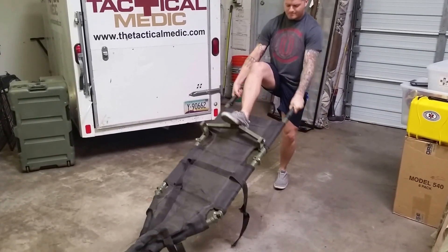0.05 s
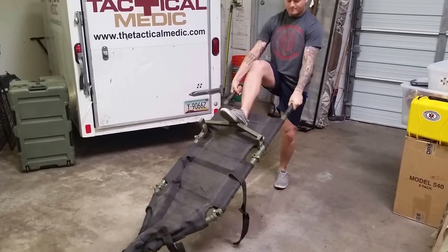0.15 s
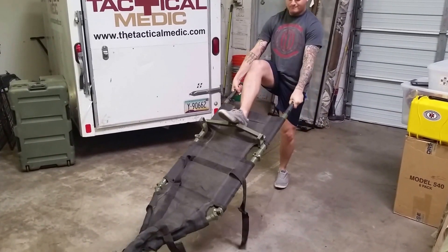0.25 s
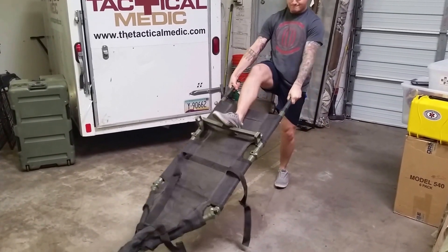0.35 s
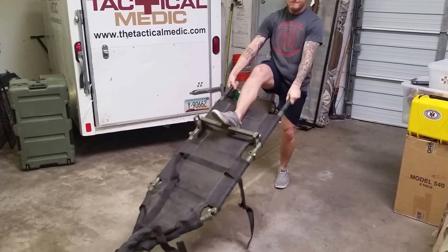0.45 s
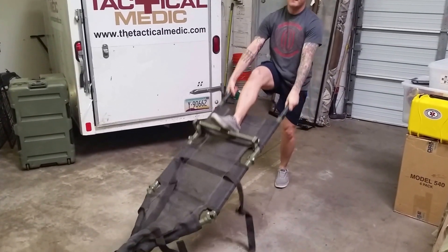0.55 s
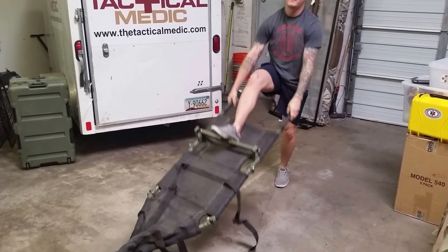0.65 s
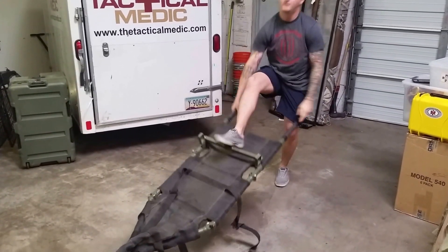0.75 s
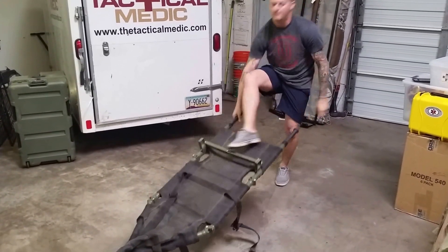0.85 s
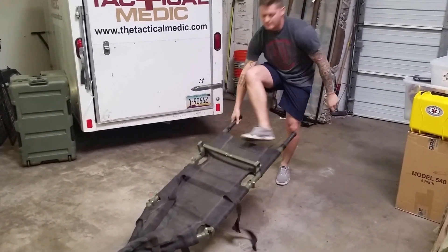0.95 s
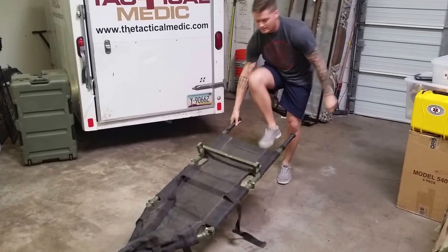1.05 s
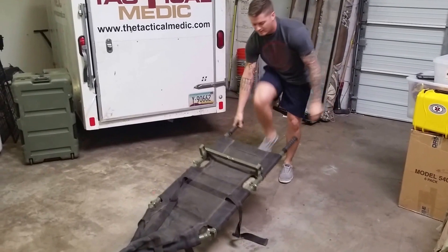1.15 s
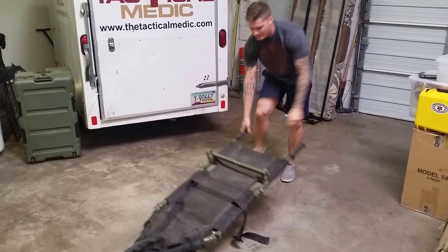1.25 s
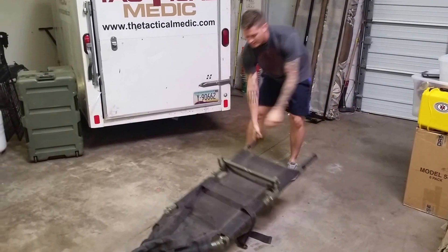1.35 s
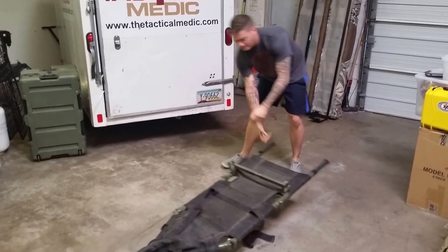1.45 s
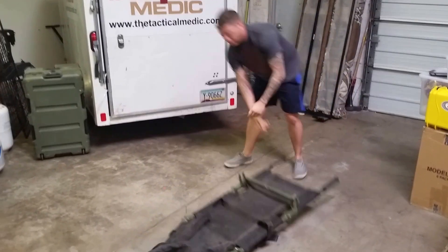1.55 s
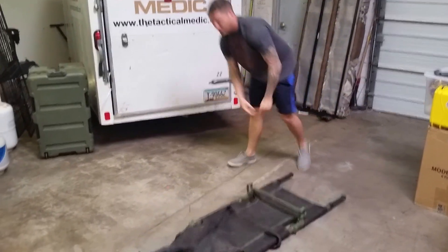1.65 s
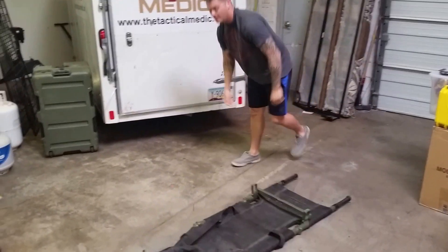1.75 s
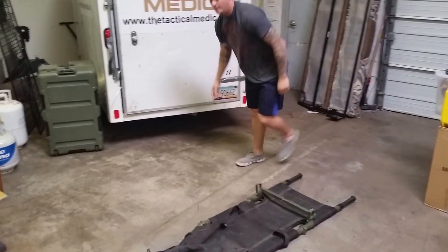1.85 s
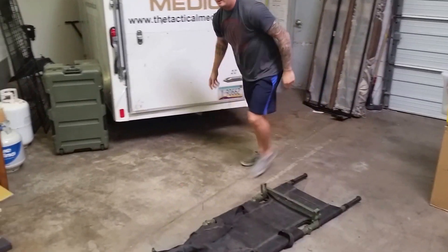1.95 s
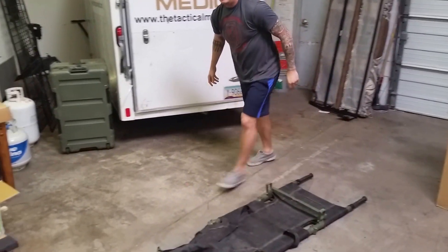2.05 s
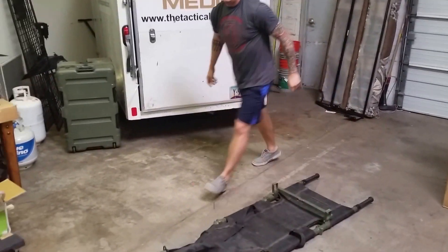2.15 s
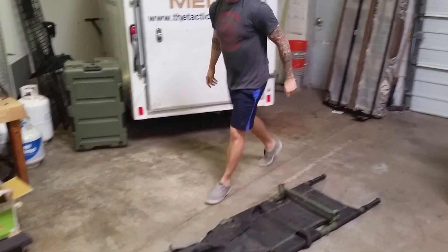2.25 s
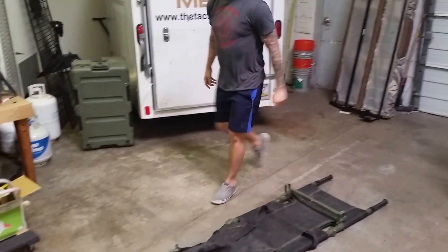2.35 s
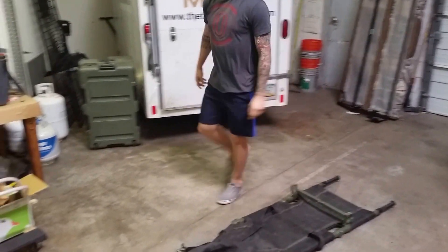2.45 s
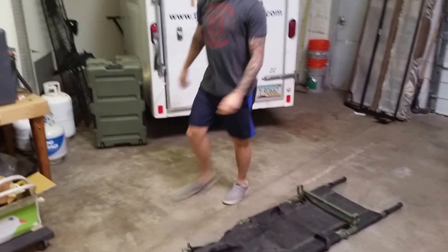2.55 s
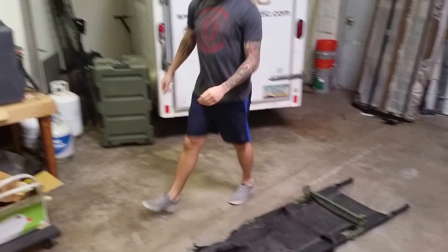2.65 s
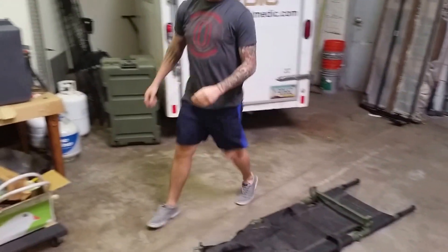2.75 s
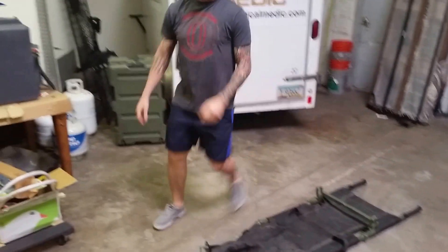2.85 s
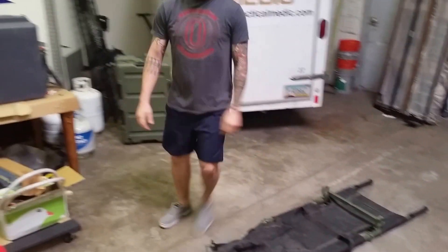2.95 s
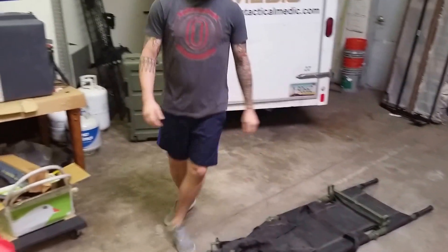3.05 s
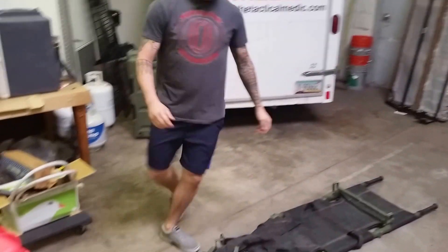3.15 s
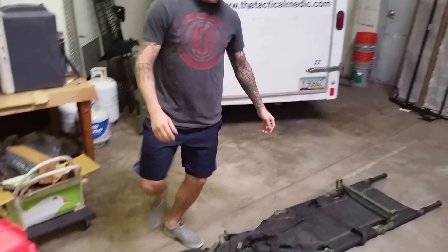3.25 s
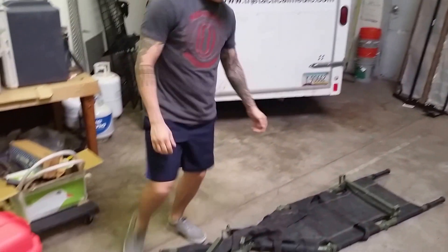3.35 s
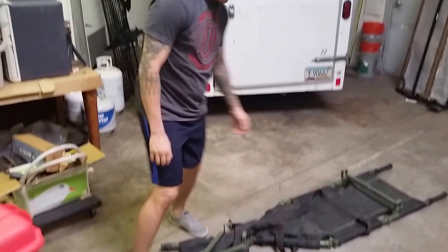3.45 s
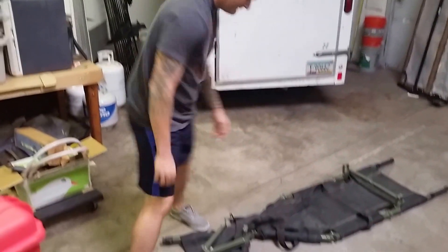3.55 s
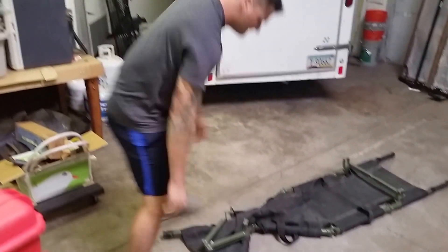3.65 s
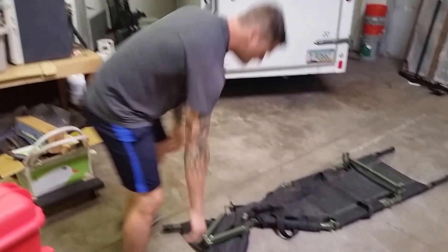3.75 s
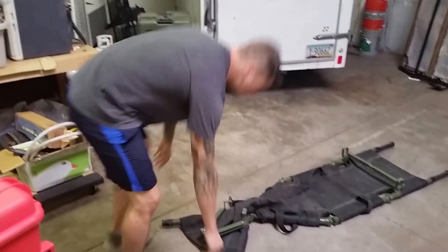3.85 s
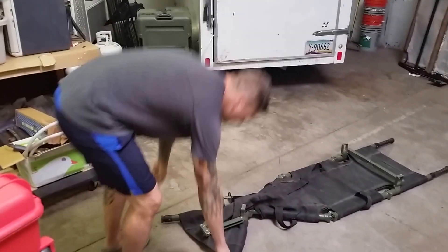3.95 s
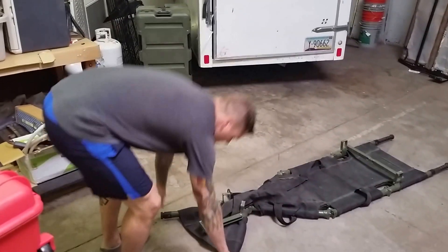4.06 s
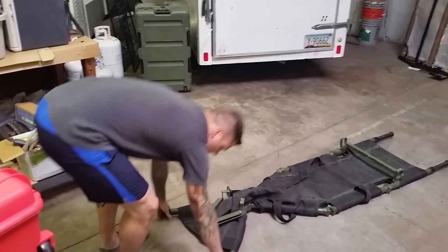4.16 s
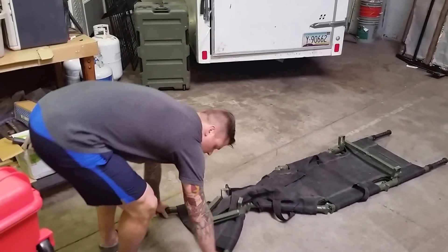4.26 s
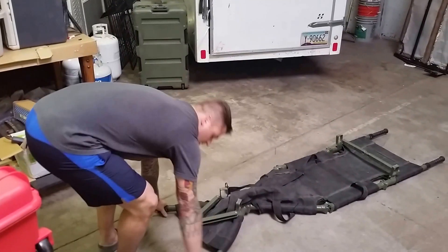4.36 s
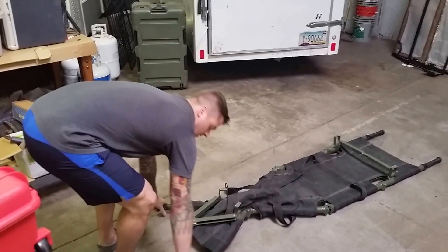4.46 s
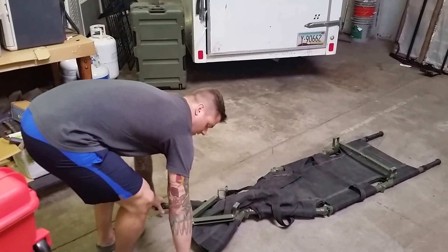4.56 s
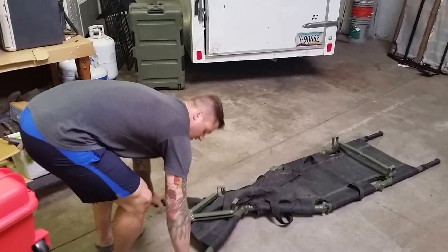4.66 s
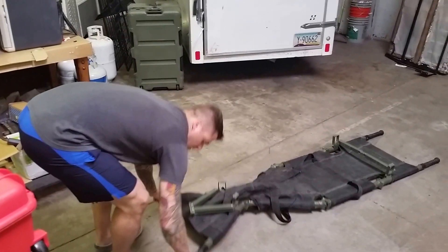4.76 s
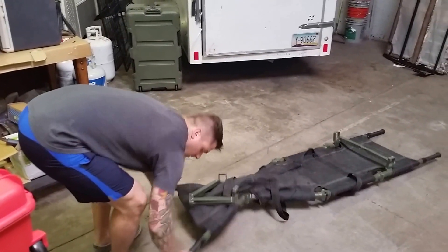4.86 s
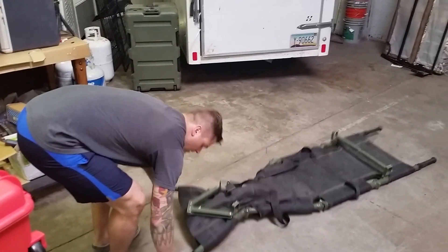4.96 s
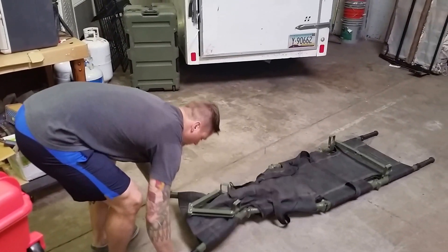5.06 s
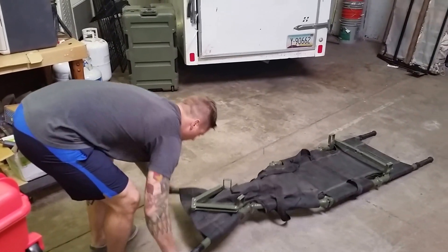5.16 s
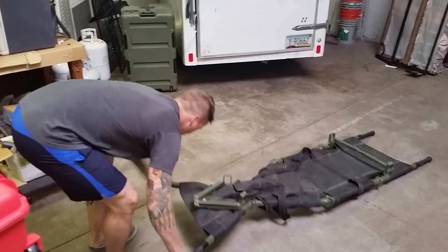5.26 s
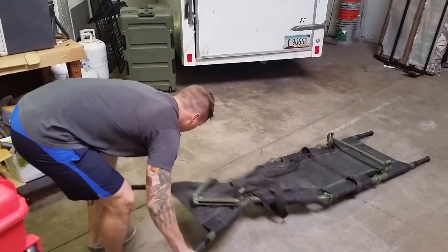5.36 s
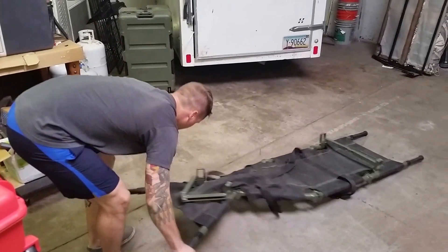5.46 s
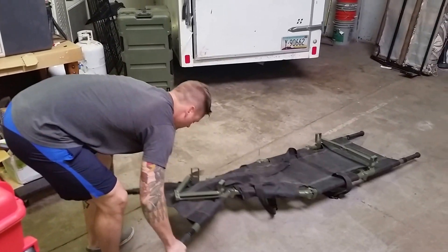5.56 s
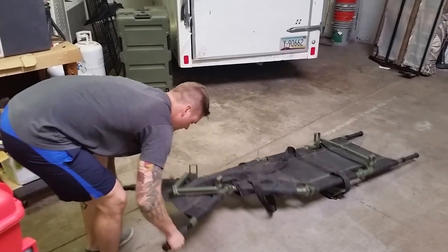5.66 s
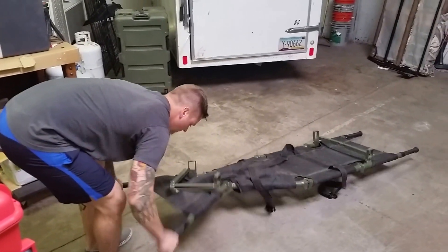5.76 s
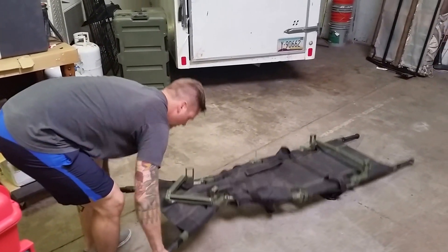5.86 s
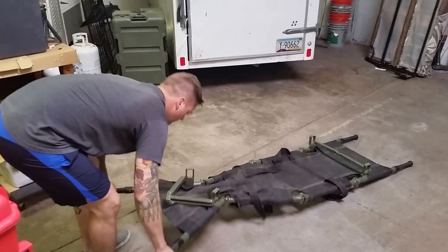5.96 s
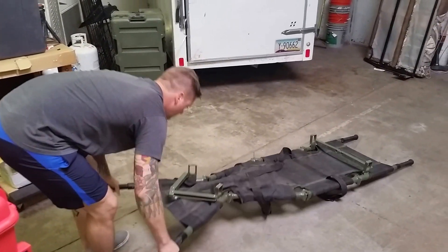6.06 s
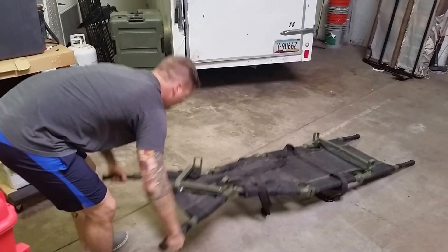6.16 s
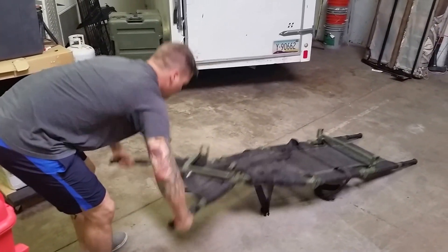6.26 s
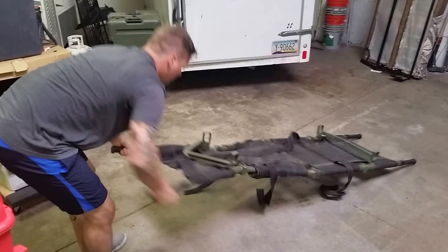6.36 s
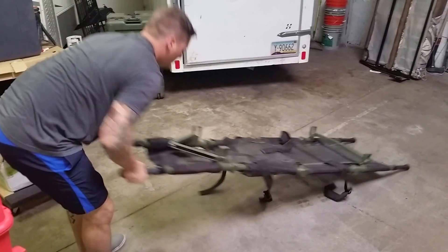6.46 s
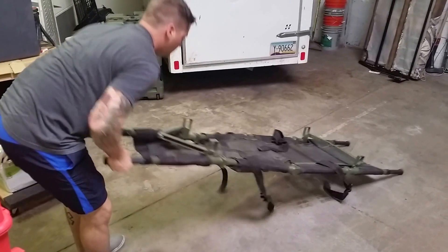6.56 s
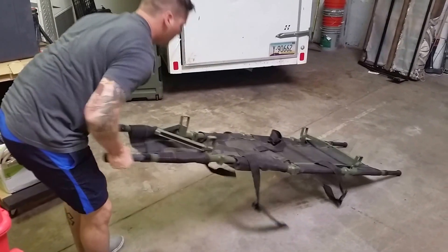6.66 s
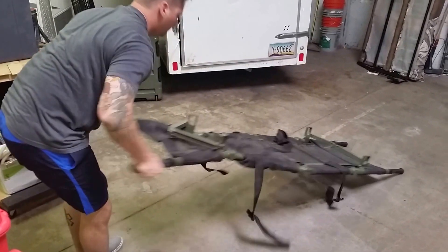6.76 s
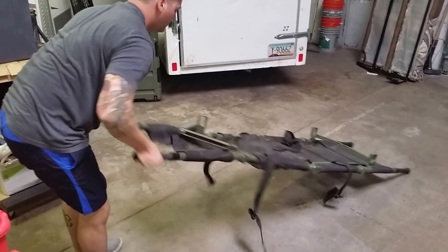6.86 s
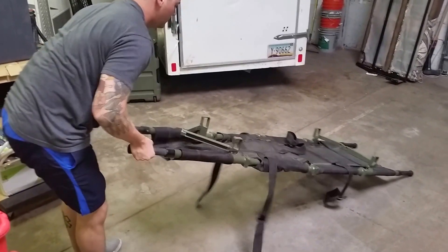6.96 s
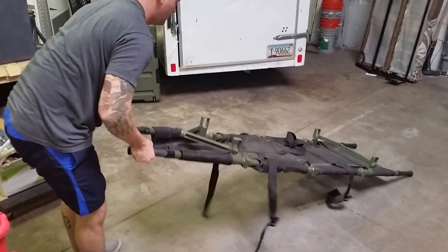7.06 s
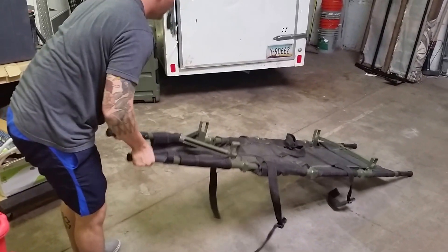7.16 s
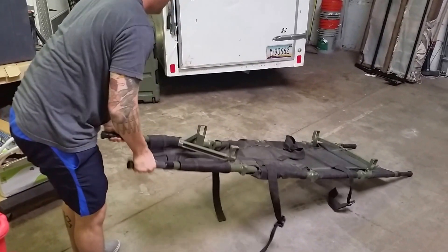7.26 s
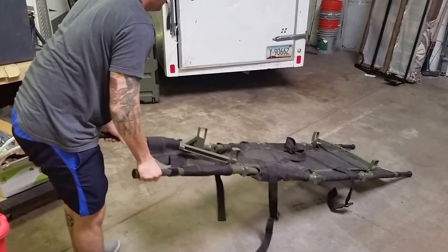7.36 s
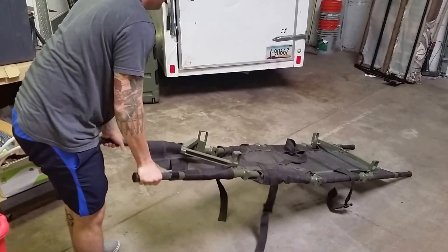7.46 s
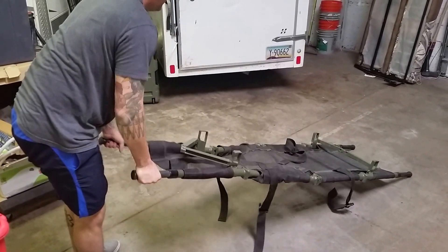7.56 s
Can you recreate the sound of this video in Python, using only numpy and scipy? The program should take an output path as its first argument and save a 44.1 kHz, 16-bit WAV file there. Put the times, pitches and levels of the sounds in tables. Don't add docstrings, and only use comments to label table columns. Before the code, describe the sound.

Folding metal-pole stretcher is kicked open with a hard clank, crashes onto concrete, then is dragged, snapped locked and lifted with rattles in a humming garage.

```python
import sys
import numpy as np
from scipy import signal
from scipy.fft import rfft, irfft
from scipy.io import wavfile

SR = 44100
rng = np.random.default_rng(int(sys.argv[2]) if len(sys.argv) > 2 else 0)


def store_pcm(level_fs):
    pcm = np.round(np.clip(level_fs, -1, 1) * 32767).astype(np.int16)
    wavfile.write(sys.argv[1], SR, np.atleast_2d(pcm).T)


def volts_from_db(level):
    exponent = np.asarray(level, float) / 20
    return 10 ** exponent


N = 335160

# (frequency [Hz], density [dB per Hz])
POLE_COLOUR = [(210, -31), (350, -7), (462, -11), (699, -5.5), (941, -2), (1340, -1.5), (1700, -3),
               (2330, -2), (3000, -19), (3900, -32), (6600, -120)]
# (frequency [Hz], density [dB per Hz])
HINGE_COLOUR = [(2000, -30.5), (2800, -9.5), (3900, -4.5), (5200, -11.5), (7000, -8), (12000, -42)]


def evened(x):
    return x / np.sqrt(np.mean(x ** 2) + 1e-20)


def read(points, hz):
    f, value = np.transpose(points)
    return np.interp(np.log(hz + 1), np.log(f + 1), value)


def add(mix, s, sound):
    part = mix[..., round(s * SR):][..., :sound.shape[-1]]
    part += sound[..., :part.shape[-1]]


def shaped(x, gain):
    return irfft(rfft(x) * gain(np.fft.rfftfreq(x.shape[-1], 1 / SR)), x.shape[-1])


def body(modes, floor_db):
    def gain(hz):
        peaks = sum(volts_from_db(2 * db) / (1 + (2 * (hz - f) / width) ** 2) for f, width, db in modes)
        return np.sqrt(volts_from_db(2 * floor_db) + peaks)
    return gain


def band(lo_hz, hi_hz):
    return lambda hz: 1 / np.sqrt((1 + (lo_hz / (hz + 1)) ** 6) * (1 + (hz / hi_hz) ** 6))


def ports(a, b):
    # (frequency [Hz], share [0-1])
    likeness = [(60, 0.75), (180, 0.91), (550, 0.92), (1650, 0.02), (4970, 0.02), (15000, 0.02)]
    same = lambda hz: np.clip(read(likeness, hz), 0, 1)
    own = shaped(b, lambda hz: np.sqrt(1 - same(hz) ** 2))
    return np.array([a, shaped(a, same) + own])


def hum():
    # (time [s], level [dB])
    rumble_level = [(0.0, -54), (0.53, -49), (0.778, -54), (1.14, -51), (1.54, -55.5), (1.88, -61.5),
                    (2.03, -66), (2.35, -60.5), (2.64, -63.5), (3.24, -53.5), (4.25, -53.5), (4.5, -53.5),
                    (5.44, -53), (5.5, -65), (6.01, -66), (6.86, -60.5), (7.09, -57), (7.6, -54)]
    # (frequency [Hz], density [dB per Hz])
    rumble_colour = [(20, -23), (45, -16.5), (80, -18), (130, -16), (200, -18.5), (300, -26.5), (660, -41),
                     (2200, -51.5), (4800, -66.5), (15000, -75)]
    # (time [s], level [dB])
    drone_level = [(0.0, -58.5), (0.8, -54.5), (1.5, -57), (2.0, -61), (2.6, -58), (3.3, -49), (4.2, -56),
                   (5.43, -54), (5.49, -74.5), (6.8, -63), (7.6, -55.5)]
    t = np.arange(N) / SR
    noise = shaped(rng.standard_normal((3, N)), lambda f: volts_from_db(read(rumble_colour, f)))
    waver = evened(shaped(noise[2], band(.3, 6.5)))
    drone = (1 + 0.11 * waver) * np.sin(2 * np.pi * np.cumsum(76.5 + .3 * waver) / SR)
    rumble = volts_from_db(np.interp(t, *np.transpose(rumble_level))) * evened(ports(*noise[:2]))
    return rumble + volts_from_db(np.interp(t, *np.transpose(drone_level))) * drone


def garage(x):
    # (frequency [Hz], t60 [s])
    room_decay = [(100, 0.33), (330, 0.39), (900, 0.44), (2200, 0.57), (3100, 0.57), (4000, 0.54),
                  (6500, 0.48), (14000, 0.28)]
    # (delay [s], level [dB])
    echoes = [(.004, -9), (.008, -8), (0.011, -10), (0.02, -9), (0.026, -7)]
    out, turn, t_tail = np.zeros((2, N)), np.arange(N) / SR / .13, np.arange(SR) / SR
    for k in range(3):
        hz, t, z = signal.stft(rng.standard_normal((2, SR)), SR, nperseg=256)
        fall_db = -60 * t / read(room_decay, hz)[:, None]
        far_end = volts_from_db(0.62 * fall_db - 25.5) / (1 + (hz[:, None] / 4500) ** 4)
        tail = signal.istft(z * (volts_from_db(fall_db) + far_end), SR, nperseg=256)[1][:, :SR]
        tail = ports(*tail) * np.clip(t_tail / 0.012 - .2, 0, 1)
        tail *= np.cos(np.linspace(0, np.pi / 2, SR)) ** .5
        tail /= np.linalg.norm(tail[0])
        for s, db in echoes:
            tail[[0, 1], round(s * SR) + rng.integers(0, 30, 2)] += volts_from_db(db - 7.0) * rng.choice([-1, 1])
        share = np.sqrt(2 / 3) * np.cos(2 * np.pi * (turn + k) / 3)
        out += signal.fftconvolve((x * share)[None], tail, axes=1)[:, :N]
    return out


def slips(per_s, spread_db, gain):
    sizes = volts_from_db(spread_db * np.minimum(rng.exponential(1, N), 4))
    happens = rng.random(N) < per_s / SR
    return evened(shaped(rng.standard_normal(N) * happens * sizes, gain))


def swell(s, rise_ms, fall_ms, db):
    t = np.arange(0, N + 32, 32)[:, None] / SR
    rising = (s - t) / np.maximum(rise_ms, 1)
    falling = (t - s) / np.maximum(fall_ms, 1)
    away = 1000 * np.where(t < s, rising, falling)
    level = np.linalg.norm(volts_from_db(db - 7.0 - 10 * away), axis=1)
    return np.interp(np.arange(N) / SR, t[:, 0], level)


def weight_shifts():
    # (peak [s], rise [ms], fall [ms], rumble [dB])
    shifts = [(0.064, 69, 34, -52), (0.198, 44, 57, -44.5), (0.36, 46, 92, -53.5), (0.89, 45, 74, -39.5),
              (0.97, 44, 53, -45.5), (1.07, 77, 20, -41), (1.489, 3, 27, -41.5), (1.66, 39, 14, -42.5),
              (1.777, 3.8, 104, -29), (1.89, 16, 45, -36), (2.902, 55, 63, -56.5), (3.26, 64, 83, -50),
              (3.6, 4.2, 63, -51), (3.85, 300, 760, -58), (4.397, 3, 53, -40), (4.645, 100, 90, -30.5),
              (4.5, 36, 73, -40.5), (5.359, 3.9, 11, -34.5), (5.447, 2.8, 15, -35.5),
              (6.62, 27, 380, -52.5), (7.006, 130, 110, -43.5), (7.3, 180, 300, -60), (5.17, 31, 45, -41)]
    # (frequency [Hz], width [Hz], level [dB])
    frame_modes = [(140, 20, -7.5), (223, 77, -13.5), (362, 63, -21)]
    rumble = slips(1500, 0.97, lambda f: body(frame_modes, -16)(f) * band(90, 650)(f))
    return swell(*np.transpose(shifts)) * rumble


def dragged_frame():
    # (peak [s], rise [ms], fall [ms], level [dB])
    drags = [
        (4.397, 4, 61, -33.5),
        (4.53, 35, 83, -33),
        (4.64, 49, 55, -26),
    ]
    thrum = slips(700, 2.0, lambda f: body([(375, 110, 0)], -60)(f) ** 2)
    return swell(*np.transpose(drags)) * thrum


def brushing():
    # (peak [s], rise [ms], fall [ms], level [dB], tone [Hz])
    strokes = [(0.16, 160, 170, -55.5, 890), (0.91, 42, 60, -52.5, 490), (1.82, 56, 58, -22.5, 1750),
               (2.1, 50, 110, -52, 1900), (3.2675, 24, 90, -50.5, 690), (3.62, 16, 52, -55, 804),
               (2.1, 60, 21, -36.5, 7100), (3.83, 105, 200, -58.5, 1800), (4.96, 4, 24, -34.5, 1300),
               (4.05, 300, 49, -52.5, 1800), (5.425, 20, 20, -23, 11600), (5.3, 1.6, 68, -43, 6800),
               (7.1, 100, 110, -58, 12500), (1.02, 25, 32, -50, 13600), (6.3, 76, 150, -76.5, 11900),
               (4.7, 200, 190, -61, 11000), (3.8, 140, 150, -56, 406), (6.05, 53, 130, -47, 2140),
               (6.57, 24, 66, -43.5, 990), (6.66, 29, 57, -41.5, 1400), (7.6, 110, 59, -58.5, 1370)]
    out = np.zeros(N)
    for *stroke, hz in strokes:
        width_hz = min(0.21 * hz, 2000)
        out += swell(*stroke) * slips(9000, 1.0, lambda f: body([(hz, width_hz, 0)], -40)(f) ** 2)
    return out


def sliding():
    # (peak [s], rise [ms], fall [ms], scrape [dB], grit [dB])
    slides_open = [(0.05, 260, 210, -57, -61.5), (0.198, 73, 120, -55, -64.5), (0.311, 8, 82, -66, -56),
                   (0.41, 23, 12, -53, -65.5), (0.72, 69, 115, -51, -52.5), (0.861, 4.1, 25, -40, -68),
                   (1.01, 18, 36, -40, -43.5), (1.28, 190, 720, -62.5, -66.5), (1.515, 3, 56, -57.5, -54),
                   (1.58, 2.6, 40, -46.5, -63), (1.66, 4, 19, -32, -47.5), (1.728, 17, 11, -37.5, -46.5),
                   (1.78, 8, 160, -29, -22), (1.888, 21, 27, -20, -27), (1.93, 52, 66, -24, -30.5)]
    # (peak [s], rise [ms], fall [ms], scrape [dB], grit [dB])
    slides_pull = [(2.775, 3.2, 80, -84, -62), (2.93, 6.9, 97, -70.5, -59), (3.2, 25, 44, -58, -42),
                   (3.3, 55, 180, -65.5, -60), (3.619, 15.5, 160, -56, -44), (3.78, 100, 230, -54, -62),
                   (4.08, 320, 83, -59.5, -56.5), (4.26, 180, 89, -100.5, -58), (4.021, 14, 68, -64, -45),
                   (4.4, 3.2, 84, -33.5, -36), (4.442, 25.5, 51, -32.5, -25.5), (4.55, 45, 87, -39, -49),
                   (4.666, 102, 31, -29, -43), (4.88, 160, 200, -42, -48.5), (5.424, 35, 8.5, -30, -18.5),
                   (6.35, 80, 120, -52, -77), (6.61, 48, 15, -39.5, -63), (6.68, 8.4, 77, -45.5, -53),
                   (6.88, 114, 60, -45, -52.5), (6.99, 53, 51, -42.5, -49), (7.045, 30, 11, -47, -59),
                   (7.15, 11, 88, -53, -55), (7.55, 123, 104, -59, -56)]
    # (frequency [Hz], density [dB per Hz])
    scuff_colour = [(3500, -31), (5500, -13.5), (7500, -9), (10500, -4), (12300, -1), (16000, -5)]
    scrape = slips(3000, 4.1, lambda f: volts_from_db(read(POLE_COLOUR, f)) * band(450, 4500)(f))
    rasp = slips(5000, 3.0, lambda f: volts_from_db(read(HINGE_COLOUR, f)))
    hiss = slips(7700, 0.98, lambda f: volts_from_db(read(scuff_colour, f)))
    *shape, scrape_db, grit_db = np.transpose(slides_open + slides_pull)
    rasp_db = (scrape_db + grit_db) / 2 - 6.5
    return swell(*shape, scrape_db) * scrape + swell(*shape, grit_db) * hiss + swell(*shape, rasp_db) * rasp


def struck(colour):
    hz = abs(np.fft.fftfreq(4096, 1 / SR))
    log_gain = np.log(volts_from_db(np.maximum(read(colour, hz), -60)))
    pulse = np.fft.ifft(np.exp(np.conj(signal.hilbert(log_gain)))).real[:2048]
    return pulse / abs(pulse).max()


def chatter(pulse, db, t60):
    rattle = rng.standard_normal(len(pulse)) * volts_from_db(db - 60 * np.arange(len(pulse)) / SR / t60)
    return signal.fftconvolve(rattle, pulse)[:len(pulse)]


def ring(hz, t60, phase, t):
    return np.sin(2 * np.pi * (hz * t + phase)) * volts_from_db(-60 * t / t60) * (1 - np.exp(-t / 0.00078))


def blow(bodies, knock_db, hz, thud_db, clink_db, tick_db):
    t = np.arange(2048) / SR
    tube, hinge, grit = bodies
    slab_modes = [(360, -4.0, 0.023), (258, -0.5, 0.018), (146, -11.5, 0.046)]  # (Hz, dB, t60 s)
    spread = .92 + 0.25 * rng.random(3)
    thud = sum(volts_from_db(db) * ring(f * k, t60, 0, t) for (f, db, t60), k in zip(slab_modes, spread))
    contact = volts_from_db(knock_db - 13.5) * tube + volts_from_db(clink_db + 9.5) * hinge + volts_from_db(tick_db + 8.0) * grit
    hollow = volts_from_db(-13.0) * ring(hz, 0.029, 0, t) + volts_from_db(-11.0) * ring(1.2 * hz, 0.0043, 0, t)
    hollow += volts_from_db(-6.5) * np.sin(2 * np.pi * hz * t) * np.exp(-((t - .0016) / 0.00098) ** 2)
    brief = ring(hz, 0.006, 0, t)
    after = volts_from_db(knock_db - 5.5) * chatter(tube, -15.0, 0.03)
    after += volts_from_db(clink_db) * chatter(hinge, -3.5, 0.039)
    after += volts_from_db(tick_db) * chatter(grit, -6, 0.045)
    direct = contact + after + volts_from_db(knock_db) * hollow + volts_from_db(thud_db + 2) * thud
    to_room = contact + 0.48 * after + volts_from_db(knock_db) * brief + volts_from_db(thud_db - 6.5) * thud
    return np.array([direct, to_room])


def small_parts():
    # (time [s], frequency [Hz], level [dB], t60 [s])
    buckles = [
        (4.934, 4450, -29.5, 0.064),
        (5.624, 1900, -34, 0.084),
        (5.622, 2470, -36, 0.077),
        (5.622, 4430, -37, 0.091),
        (5.622, 7500, -41, 0.053),
    ]
    # (time [s], frequency [Hz], level [dB], t60 [s])
    glints = [(0.933, 12000, -41.5, 0.026), (1.081, 11200, -26, 0.012), (1.509, 12300, -36, 0.012),
              (0.424, 140, -20.5, 0.073), (0.47, 220, -25, 0.091), (1.743, 350, -23, 0.04),
              (1.752, 413, -17.5, 0.05), (1.88, 387, -16.5, 0.051), (1.888, 330, -21.5, 0.046),
              (5.448, 335, -32, 0.05), (5.45, 198, -32, 0.06), (3.586, 491, -39, 0.048),
              (3.586, 850, -44.5, 0.04), (4.96, 404, -22, 0.04), (4.961, 3800, -30, 0.06),
              (5.083, 2100, -11, 0.0073), (5.622, 13100, -34, 0.012), (6.5235, 1920, -26, 0.01),
              (1.9, 2300, -19, 0.06), (1.95, 2130, -21, 0.065), (4.96, 8850, -30, 0.067),
              (4.961, 5580, -24, 0.06), (5.4102, 11400, -12, 0.012), (5.4165, 12800, -17, 0.015),
              (5.425, 11300, -11, 0.015), (5.433, 11300, -14, 0.015), (5.4525, 10770, -7, 0.025),
              (5.4528, 11400, -19, 0.024), (5.798, 7170, -28, 0.03), (5.7961, 8600, -31.5, 0.037),
              (5.798, 1013, -42.5, 0.056), (6.011, 12900, -29, 0.04), (6.243, 2320, -44, 0.08),
              (6.413, 2306, -43.5, 0.057), (6.929, 1990, -48, 0.025), (7.059, 1437, -34.5, 0.093),
              (7.06, 1049, -33.5, 0.088)]
    out, t = np.zeros((2, N)), np.arange(8000) / SR
    for s, hz, db, t60 in buckles:
        add(out, s, volts_from_db(db) * ring(hz, t60, 0, t) * [[1], [.15]])
    for s, hz, db, t60 in glints:
        to_room = 0.7 * ring(hz, t60 / 4, 0, t)
        add(out, s, volts_from_db(db) * np.array([ring(hz, t60, 0, t), to_room]))
    return out


def frame_blows():
    # (time [s], knock [dB], knock tone [Hz], thud [dB], tick [dB])
    kick = [(0.299, -38.5, 846, -73.5, -49), (0.4205, -15, 1300, -22, -41.5),
            (0.4225, -6, 1780, -39.5, -36.5), (0.427, -16.5, 1850, -12, -28), (0.431, -16.5, 782, -47, -25),
            (0.45, -13, 1710, -32.5, -21.5), (0.847, -38, 1062, -47, -44), (0.933, -24, 1400, -50, -40.5),
            (1.081, -19, 1121, -34, -36.5), (1.488, -43.5, 712, -37, -65), (1.509, -39, 1930, -50, -50),
            (1.527, -39, 616, -32.5, -62.5), (1.576, -28.5, 1058, -44.5, -57),
            (1.648, -21, 1115, -51.5, -36), (1.653, -25.5, 1700, -53.5, -37.5),
            (1.71, -29.5, 1139, -38.5, -38)]
    fall = [(1.743, -11, 1500, -18, -24.5), (1.754, -5, 1545, -16, -16.5), (1.759, -5.5, 1900, -26, -20.5),
            (1.769, -15.5, 1640, -34.5, -15.5), (1.815, -9.5, 1600, -34, -32.5),
            (1.83, -14.5, 1800, -34.5, -27.5), (1.843, -15, 2100, -36.5, -28.5),
            (1.805, -16, 1660, -29.5, -16), (1.854, -13, 1760, -34.5, -40.5),
            (1.8785, -13.5, 1250, -25, -28), (1.884, -15, 1500, -26.5, -29.5),
            (1.891, -15.5, 1400, -21, -20), (1.9, -15, 2300, -51.5, -40), (1.91, -12, 2350, -50, -36.5),
            (1.94, -17.5, 2120, -50.5, -40), (1.97, -21, 2220, -20, -38.5), (2.051, -41.5, 1140, -38, -65)]
    steps = [(2.3395, -75.5, 1500, -61, -44), (2.764, -68, 725, -52, -74), (2.804, -62, 1820, -75, -69),
             (2.874, -52, 1095, -45.5, -75), (2.921, -72, 713, -60, -63), (3.146, -68.5, 612, -54.5, -59),
             (3.196, -43, 705, -36.5, -56), (3.253, -46, 598, -41.5, -53), (3.585, -60, 875, -41.5, -84),
             (3.608, -61, 870, -67, -43), (4.012, -51, 480, -29.5, -75), (4.393, -34.5, 1300, -37.5, -41.5)]
    pull = [(4.667, -40.5, 770, -38.5, -40.5), (4.924, -41, 933, -54.5, -44.5),
            (4.933, -36, 967, -42.5, -29.5), (4.959, -18.5, 1226, -28, -25), (4.963, -18, 1786, -30, -20),
            (4.968, -18.5, 678, -35, -42.5), (5.082, -2, 2005, -18.5, -16), (5.108, -7, 1780, -35.5, -20.5),
            (5.13, -12, 1860, -31, -21.5), (5.356, -35.5, 1260, -51.5, -51),
            (5.389, -32.5, 1670, -66.5, -32), (5.41, -35, 1730, -73.5, -20), (5.416, -28, 1590, -70, -18),
            (5.423, -60.5, 1610, -55.5, -24.5), (5.442, -23, 915, -41.5, -42.5),
            (5.452, -13.5, 1754, -50.5, -9)]
    lift = [(5.622, -35, 2140, -75, -34), (5.797, -36, 1130, -56, -30.5), (5.986, -19.5, 1350, -56, -34.5),
            (6.009, -17, 1630, -40, -24.5), (6.013, -27, 2220, -51, -28.5), (6.243, -31, 1450, -67, -45),
            (6.411, -37, 1305, -54.5, -44), (6.523, -24.5, 1850, -45, -48), (6.619, -25.5, 1010, -47, -40),
            (6.624, -24, 2090, -47, -34.5), (6.639, -28, 950, -55, -59), (6.655, -33, 970, -59, -53),
            (6.85, -37, 1200, -45, -67), (6.93, -29, 1060, -64, -63), (6.973, -39, 1570, -40, -62),
            (6.996, -32.5, 1200, -39, -60), (7.056, -22, 1470, -38, -36.5), (7.253, -38.5, 1750, -46, -54),
            (7.539, -43, 1437, -41, -76)]
    # (frequency [Hz], density [dB per Hz])
    bar_colour = [(150, -14), (250, -6), (460, -10), (650, -3), (1100, -6), (1700, -0.5), (2200, -9),
                  (3000, -23.5), (3900, -32), (6600, -120)]
    # (frequency [Hz], density [dB per Hz])
    grit_colour = [(3500, -30), (5500, -5), (7000, -5), (10000, -2.5), (16000, -5.5)]
    # blows, tube struck, hinge clink against the mean of knock and tick [dB]
    stages = [(kick, bar_colour, -12.5), (fall, POLE_COLOUR, -6), (steps, POLE_COLOUR, -12.5),
              (pull, POLE_COLOUR, -11), (lift, POLE_COLOUR, -15.5)]
    out = np.zeros((2, N))
    for rows, tube_colour, clink_db in stages:
        bodies = [struck(colour) for colour in (tube_colour, HINGE_COLOUR, grit_colour)]
        for s, knock_db, hz, thud_db, tick_db in rows:
            hinge_db = (knock_db + tick_db) / 2 + clink_db
            add(out, s, blow(bodies, knock_db, hz, thud_db, hinge_db, tick_db))
    return out


def scene():
    # (time [s], left-right [dB], room share [dB])
    place = [(0.0, -1, 2.5), (1.21, 1, 0), (1.4, -2, 0.5), (1.7, 1, 0.9), (2.501, 1, -16.5),
             (2.75, -7.5, 1.5), (3.78, 2, -3), (4.258, -2.5, 6), (4.7, -2, 0.5), (4.9, 0, -0.5),
             (5.05, -2, 1), (5.25, 7.5, 14), (5.36, -2, 4.5), (5.6, -3.5, -6), (5.78, 10, 2.5),
             (5.94, -6, 0), (7.07, -1, 1), (7.6, -3, -0.5)]
    lift_lag_s, lift_from_s = 0.00012, 5.93
    t = np.arange(N) / SR
    s, pan_db, room_db = np.transpose(place)
    rubs = sliding() + brushing() + weight_shifts() + dragged_frame()
    blows = frame_blows() + small_parts()
    paths = rng.standard_normal(800) * np.exp(-t[:800] / 0.01)
    wide = ports(rubs, signal.oaconvolve(rubs, paths / np.linalg.norm(paths))[:N])
    pan = volts_from_db(np.array([[.5], [-.5]]) * np.interp(t, s, pan_db))
    direct = (shaped(blows[0], band(58, 20000)) + volts_from_db(3.0) * wide) * pan
    moved = shaped(direct[0], lambda hz: np.exp(-2j * np.pi * hz * lift_lag_s))
    direct[0] = np.where(t < lift_from_s, direct[0], moved)
    sent = shaped(volts_from_db(5.0) * blows[1], band(100, 20000)) + volts_from_db(-3.0) * rubs
    return direct + garage(sent * volts_from_db(np.interp(t, s, room_db))) + hum()


def band_limit(x):
    return signal.sosfilt(signal.butter(12, 15780, fs=SR, output="sos"), x)


def record(dry):
    # (frequency [Hz], left-right [dB])
    balance = [(60, -2.5), (300, 2), (1000, 0), (2500, 3.5), (7000, 6), (12000, -4)]
    # (frequency [Hz], width [Hz], level [dB])
    capsule = [(3350, 240, -4), (6040, 490, -8.5), (10260, 1800, -3), (12100, 1200, 7)]
    # (time [s], level [dB])
    hush_level = [
        (2.0, 0),
        (2.1, -20),
        (2.2, -30.5),
        (2.7, -8),
        (2.76, -1.5),
    ]
    hush_hz, edge_hz, left_lag_s = 5000, 14560, -0.000085
    side = np.array([[.5], [-.5]])

    def ports_gain(hz):
        colour_db = sum(db / (1 + (2 * (hz - f) / width) ** 2) for f, width, db in capsule)
        lag = np.exp(-2j * np.pi * hz * side * left_lag_s)
        return volts_from_db(side * read(balance, hz) + colour_db) * lag

    def edge(hz):
        return band(25, 20000)(hz) / (1 + np.exp(np.clip((hz - edge_hz) / 90, -50, 5.5)))

    hush = volts_from_db(np.interp(np.arange(N) / SR, *np.transpose(hush_level)))
    treble = shaped(dry, lambda hz: 1 / (1 + (hush_hz / (hz + 1)) ** 4))
    hushed = dry - (1 - hush) * treble
    overloaded = np.tanh(shaped(hushed, ports_gain))
    return band_limit(shaped(overloaded, edge))


dry = scene()
out = record(dry)
store_pcm(out)
```